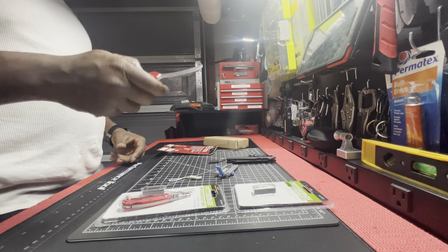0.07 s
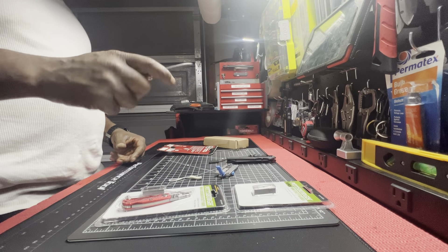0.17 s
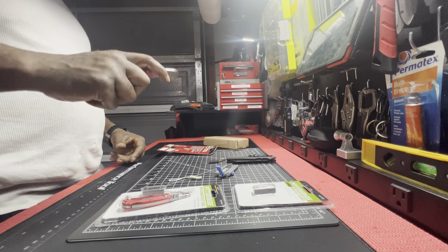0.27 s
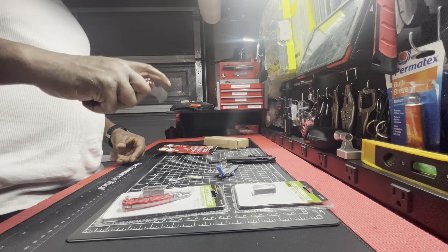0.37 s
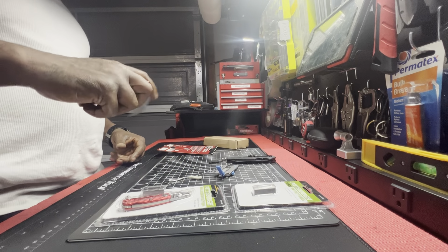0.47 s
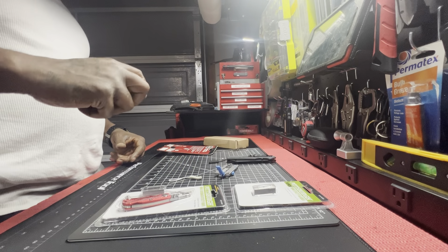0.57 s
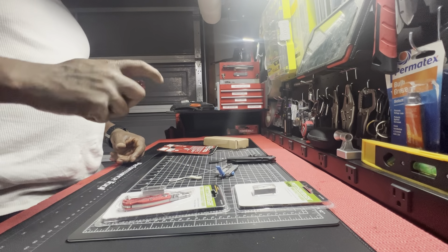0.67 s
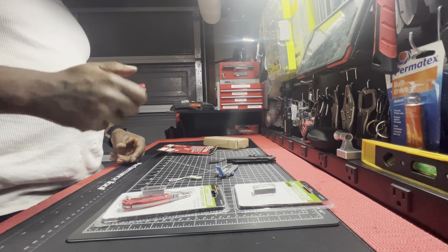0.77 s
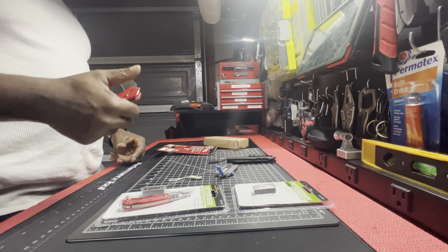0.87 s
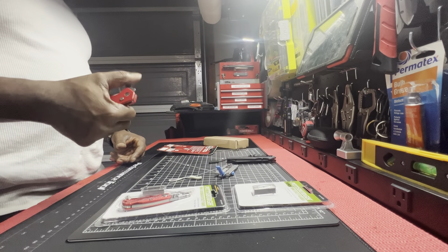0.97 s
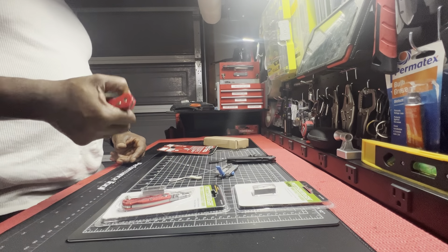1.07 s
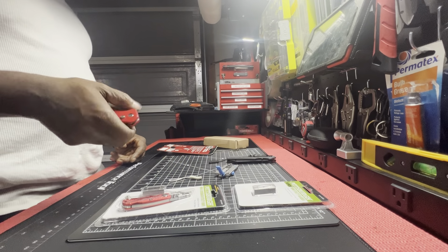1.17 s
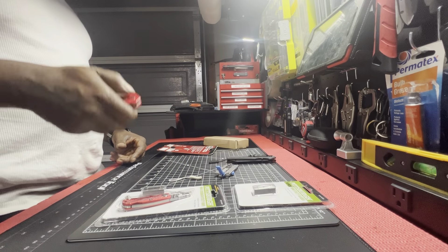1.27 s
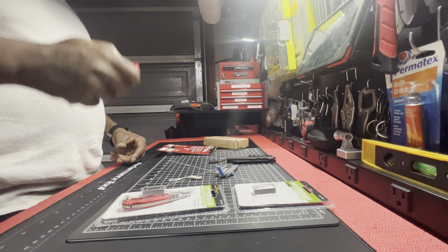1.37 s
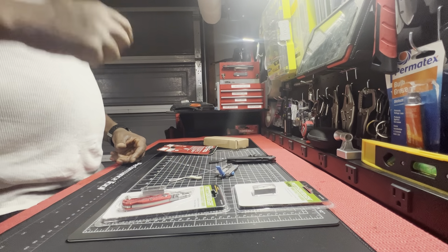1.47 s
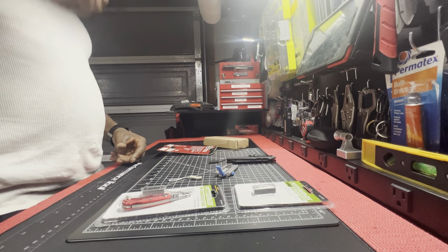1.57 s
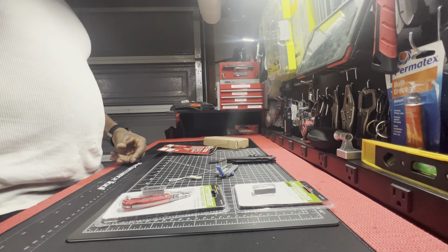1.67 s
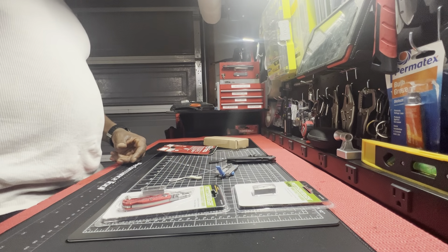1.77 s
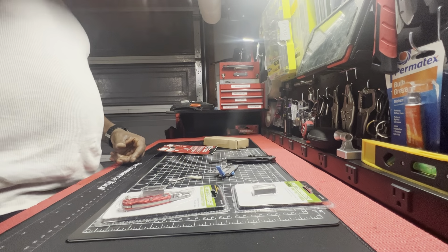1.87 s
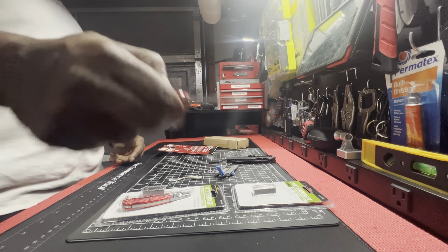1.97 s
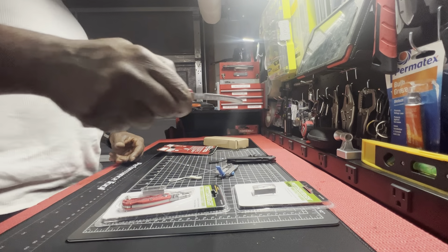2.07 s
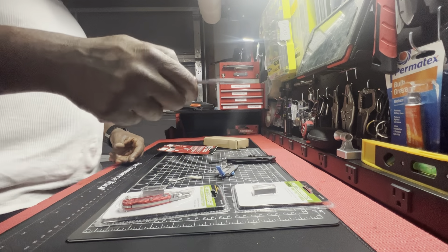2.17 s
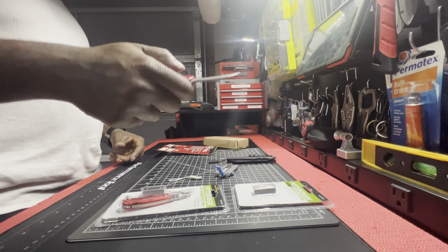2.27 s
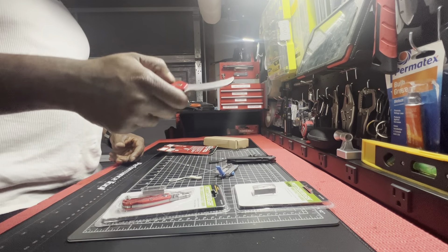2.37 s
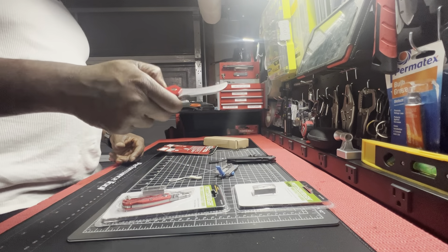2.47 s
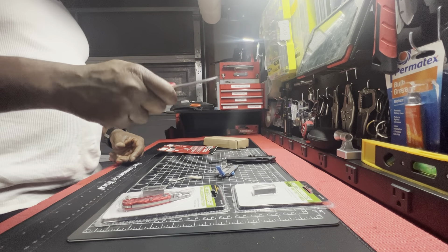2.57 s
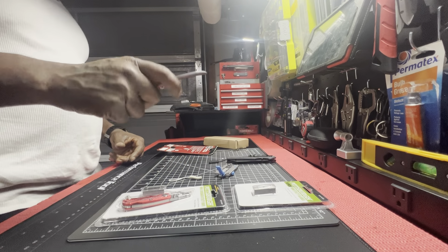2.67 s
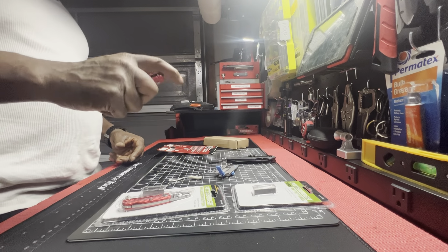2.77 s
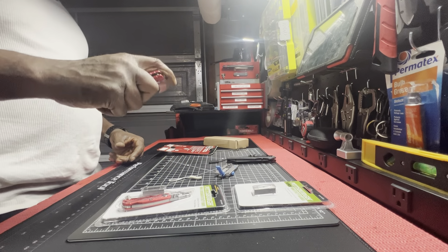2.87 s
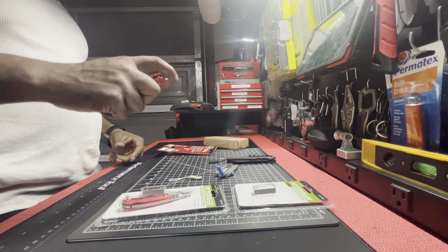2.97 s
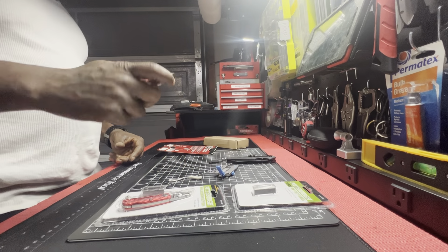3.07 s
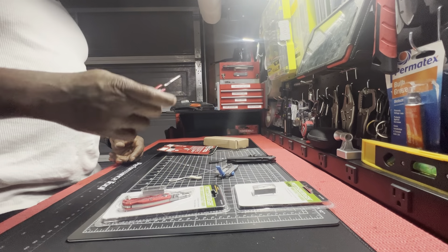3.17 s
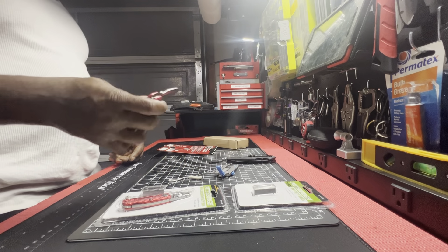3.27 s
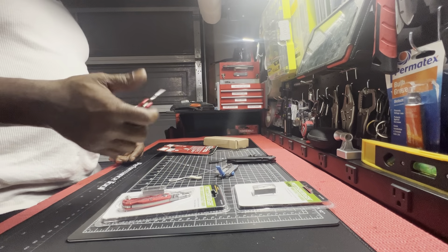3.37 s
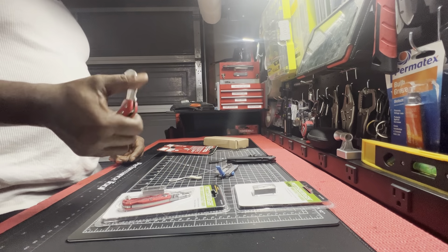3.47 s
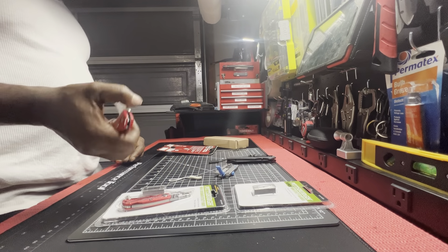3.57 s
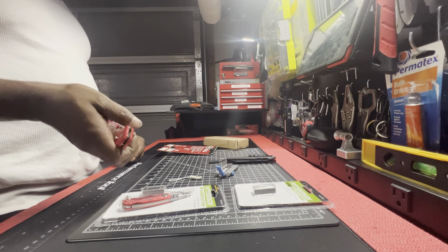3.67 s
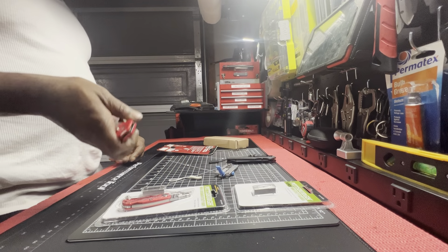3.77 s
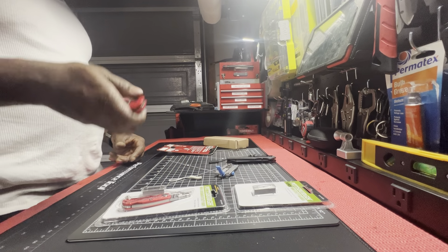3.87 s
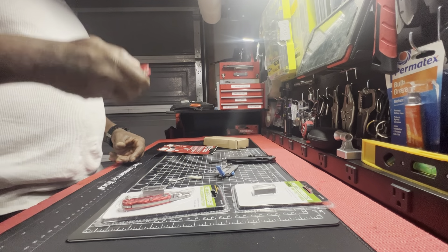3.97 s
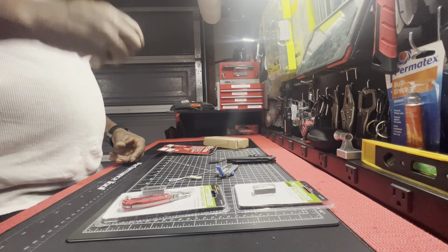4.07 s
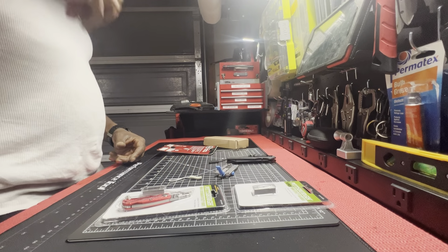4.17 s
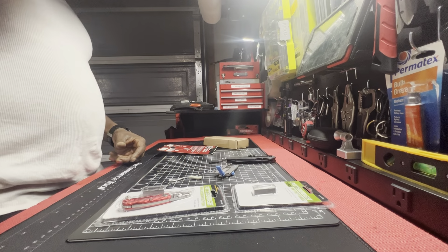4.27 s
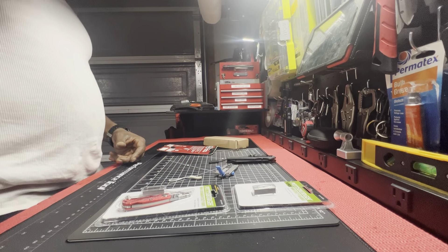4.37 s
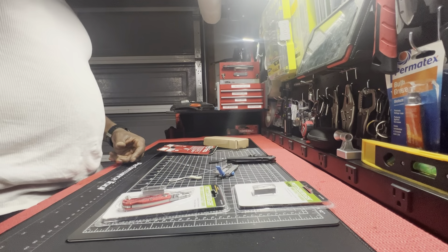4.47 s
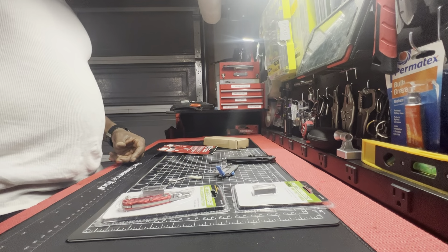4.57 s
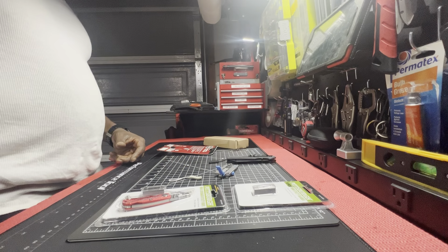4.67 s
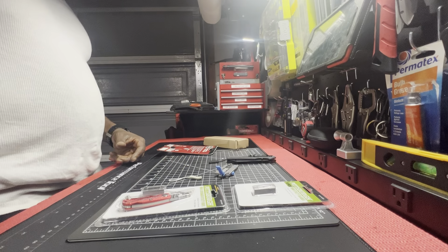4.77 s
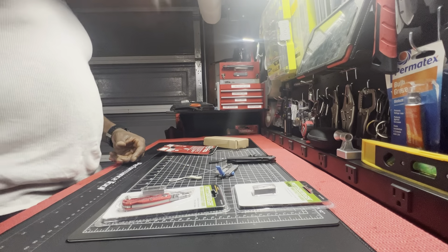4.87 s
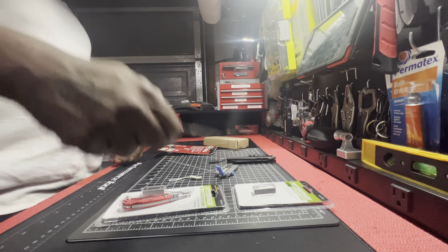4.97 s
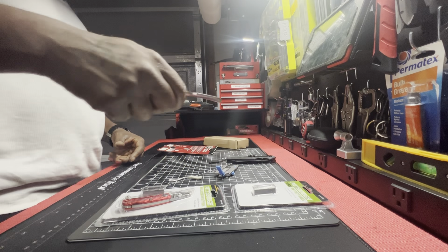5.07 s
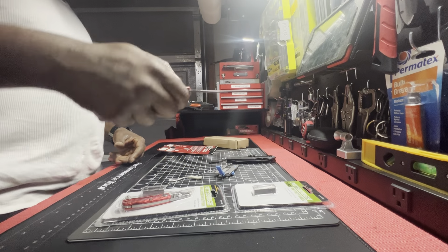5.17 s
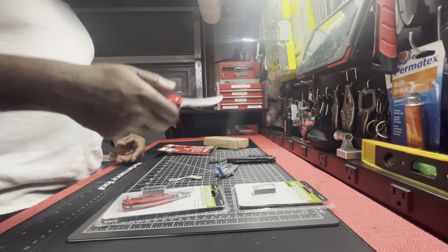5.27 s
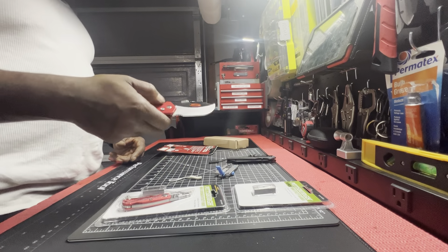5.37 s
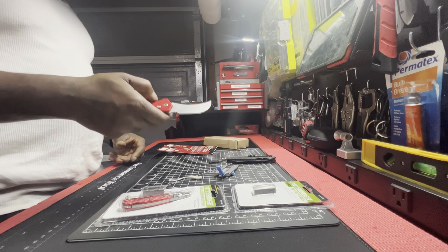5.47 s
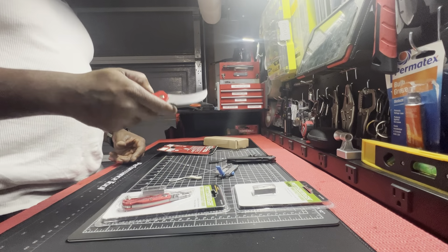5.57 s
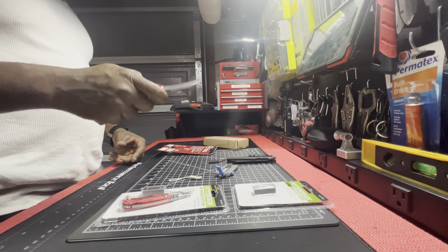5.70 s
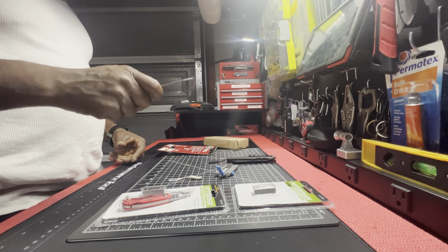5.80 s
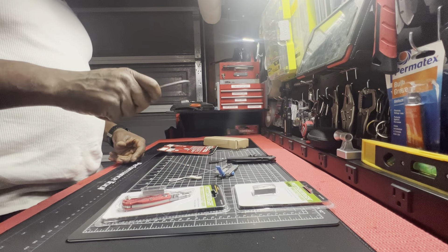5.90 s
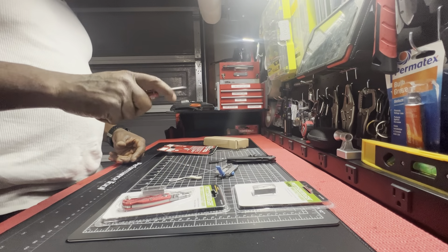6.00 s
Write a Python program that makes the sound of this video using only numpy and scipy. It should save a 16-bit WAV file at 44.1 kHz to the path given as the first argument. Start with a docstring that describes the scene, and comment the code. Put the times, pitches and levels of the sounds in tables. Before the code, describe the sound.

Bright steel snaps and duller closing clicks from a pocket knife ring briefly in a small hard room, with soft rustle, low rumble and fan hiss.

```python
"""Folding knife on a workshop bench

A folding knife is flicked open and pressed shut in one hand: bursts of noise ring through steel modes,
the handle knocks, and a hard room answers with fading noise. Grainy noise rustles in swells around it.
A fan hums (wobbly sines) and hisses (shaped noise) to the right over low rumble, a wall clock ticks
(a ringing resonance) and a faint whistle (narrow noise) comes and goes."""
import sys
import numpy as np
from scipy import signal
from scipy.fft import rfft, irfft, next_fast_len
from scipy.io import wavfile
from scipy.ndimage import map_coordinates

SR = 44100
rng = np.random.default_rng(int(sys.argv[2]) if len(sys.argv) > 2 else 0)


def dump(signal):
    """Clip the signal to [-1, 1] and save it as 16-bit WAV at the path in sys.argv[1]."""
    limited = np.clip(np.atleast_2d(signal).T, -1, 1)
    pcm = np.round(limited * 32767).astype(np.int16)
    wavfile.write(sys.argv[1], SR, pcm)


N = 266187  # length in samples, about 6 s


def amp(db):
    """Turn decibels into a gain."""
    return 10 ** (np.asarray(db) / 20)


def unit(x):
    """Scale a sound to an rms level of 1."""
    return x / np.sqrt(np.mean(x ** 2) + 1e-20)


def along(points, hz):
    """Read a curve of (Hz, value) points, with pitch on a log axis."""
    f, v = np.transpose(points)
    return np.interp(np.log(hz + 1), np.log(f + 1), v)


def wobble(rate):
    """A smooth random curve through `rate` random points a second."""
    return map_coordinates(rng.standard_normal(2000), [np.arange(N) * rate / SR])


def filtered(x, response):
    """Shape x by a complex response of frequency."""
    m = next_fast_len(x.shape[-1] + 8192)  # spare room for the ringing
    spectrum = rfft(x, m) * response(np.fft.rfftfreq(m, 1 / SR))
    return irfft(spectrum, m)[..., :x.shape[-1]]


def resonances(modes, f, scatter_db=0):
    """Response of (Hz, width Hz, dB) modes that ring after a blow, each varied at random by scatter_db."""
    total = 0
    for c, w, db in modes:
        strength = amp(db + scatter_db * rng.standard_normal())
        total = total + strength * 1j * f * w / (c * c - f * f + 1j * f * w)
    return total


SWELL_RANGE_DB = 20  # the rise and fall times of a swell cover this many dB


def swells(rows):
    """Gain of (peak s, dB, rise s, fall s) swells, straight lines in dB, summed as power."""
    t, power = np.arange(N) / SR, np.zeros(N)
    for s, db, rise, fall in rows:
        drop = SWELL_RANGE_DB * np.maximum((s - t) / abs(rise), (t - s) / abs(fall))
        power += amp(2 * (db - drop))
    return np.sqrt(power)


# Spectrum of the building's rumble in the left ear. Each row: frequency in Hz, level in dB per Hz.
RUMBLE_SPECTRUM = [(22, -100), (32, -82), (50, -79), (92, -74), (125, -81.5), (180, -84.5), (300, -83.5),
                   (420, -89.5), (750, -99), (1550, -103), (2400, -120), (5000, -128), (9000, -129),
                   (10200, -140), (16000, -148)]
# Balance of the rumble. Each row: frequency in Hz, left minus right in dB.
RUMBLE_BALANCE = [(60, 0), (110, -2.5), (200, 0.5), (380, 6.5), (600, 2), (1000, -1)]
# How alike the ears are. Each row: frequency in Hz, likeness (limited to -1 = opposite .. 1 = same).
EAR_LIKENESS = [(60, 2.5), (130, -0.13), (290, -0.4), (640, -0.46), (1400, -2.5)]
# Motor tones. Each row: frequency in Hz, unsteadiness in random points a second,
# usual rms level in dB midway between the ears.
MOTOR_TONES = [(58.9, 4.5, -57.5), (151.3, 5, -61), (237, 6.5, -71.5)]


def room_tone():
    """Building rumble, alike in both ears only in the bass, with three unsteady motor tones."""
    def turn(f):
        return np.arccos(np.clip(along(EAR_LIKENESS, f), -1, 1)) / 2

    # sum and difference of two noises: their shares set how alike the ears are
    middle, side = filtered(rng.standard_normal((2, N)), lambda f: (
        amp(along(RUMBLE_SPECTRUM, f)) * [np.cos(turn(f)), np.sin(turn(f))]))
    ears = np.array([middle + side, middle - side])
    rumble = filtered(ears, lambda f: amp(along(RUMBLE_BALANCE, f) * [[0], [-1]])) * np.sqrt(SR / 2)

    t, hum = np.arange(N) / SR, np.zeros(N)
    for hz, rate, db in MOTOR_TONES:
        level = amp(db + 0.49 * wobble(rate)) * np.sqrt(2)  # rms to peak
        hum += level * np.sin(2 * np.pi * hz * t + 1.2 * wobble(rate))
    return rumble + hum * amp([[-1.3], [1.3]])  # a little louder on the right


# Air in the fan's housing, as heard on the right. Each row: frequency in Hz, level in dB per Hz.
FAN_SPECTRUM = [(500, -112), (750, -96.5), (1000, -88.5), (1250, -91), (1550, -81.5), (1900, -96.5),
                (2400, -103), (3100, -124), (3700, -107), (4300, -102), (5200, -119), (6200, -114),
                (7050, -103), (8400, -112), (9800, -132), (12000, -145)]
# The fan's change of level on the left. Each row: frequency in Hz, gain in dB (negative is weaker).
FAN_LEFT_GAIN = [(1000, -20), (1550, -22.5), (4300, -28.5)]


def fan():
    """Turbulent air in a housing near the right ear: shaped noise with a slight flutter."""
    flutter_db = 0.89 * wobble(70) + 0.7 * wobble(12)
    air = rng.standard_normal(N) * amp(flutter_db)
    ears = filtered(air, lambda f: amp(along(FAN_SPECTRUM, f) + along(FAN_LEFT_GAIN, f) * [[1], [0]]))
    return ears * np.sqrt(SR / 2)  # so that the levels are per Hz


# Swells of the whistle. Each row: peak in seconds, peak level in dB on the left,
# seconds to rise or fall by SWELL_RANGE_DB.
WHISTLE_SWELLS = [(0, -76.5, 0.7), (1.25, -86, 0.5), (5.85, -78.5, 0.4)]


def whistle():
    """A faint whistle near 3 kHz, noise through a narrow resonance, comes and goes on the left."""
    band = unit(filtered(rng.standard_normal(N), lambda f: resonances([(3000, 370, 0)], f) ** 2))
    gain = swells([(s, db, fade, fade) for s, db, fade in WHISTLE_SWELLS])
    return gain * band * amp([[0], [-8]])


# Colour of the rustle. Each row: frequency in Hz, relative level in dB per Hz.
RUSTLE_COLOUR = [(3000, -29.5), (5500, -6), (8500, 4.5), (10000, -5), (12000, 5), (14000, -6), (16000, -6)]
# The lower creak. Each row: frequency in Hz, width in Hz, relative level in dB.
CREAK_MODES = [(3300, 1800, 0)]
# Swells of treble rustle, some rising into a snap. Each row: peak in seconds, peak level in dB
# before the overall lift, rise in seconds, fall in seconds (both over SWELL_RANGE_DB).
RUSTLE_SWELLS = [(.01, -71, .1, .36), (.306, -76.5, 0.088, 0.027), (.434, -77, 0.11, 0.054),
                 (.548, -72, 0.022, 0.022), (.592, -75, .03, .025), (.78, -86, 0.11, 0.088),
                 (1.027, -82, 0.11, 0.0094), (1.53, -96, 0.12, .04), (1.855, -73.5, 0.1, .01),
                 (2.3, -91, .1, .25), (2.656, -76.5, 0.098, .09), (2.708, -62, 0.0092, 0.016),
                 (2.75, -74, .1, 0.06), (2.878, -89, 0.031, 0.066), (3.07, -89, 0.082, 0.23),
                 (3.19, -81.5, .03, .15), (3.404, -93.5, .1, 0.076), (3.48, -86, .03, .4),
                 (3.628, -82, .1, .01), (3.94, -86, .09, .06), (4.064, -74.5, .012, 0.018),
                 (4.12, -94, 0.072, 0.27), (4.385, -82, .11, .08), (4.518, -83, 0.047, 0.053),
                 (4.862, -68.5, 0.066, 0.012), (5.28, -92, 0.093, .15), (5.46, -87, 0.065, .05),
                 (5.928, -79, 0.022, .04), (5.99, -88, 0.097, 0.086)]
REST_DB, CREAK_DB = -104, -4.5  # faint rustle at rest, before the lift; the creak against the rustle
LIFT_DB = 2.5  # raises all of the rustle and creak


def rustle():
    """A grainy treble rustle and a lower creak: shaped noises that swell and fade together."""
    grains = rng.standard_normal((3, N)) * amp(1.5 * wobble(150))
    shared, right_only = unit(filtered(grains[:2], lambda f: amp(along(RUSTLE_COLOUR, f))))
    creak = amp(CREAK_DB) * unit(filtered(grains[2], lambda f: resonances(CREAK_MODES, f) ** 2))
    resting = amp(REST_DB + 3 * wobble(25))
    gain = amp(LIFT_DB) * (swells(RUSTLE_SWELLS) + resting)
    left = shared + creak
    right = 0.89 * shared + 1.3 * right_only + 0.62 * creak
    return gain * np.array([left, right])


# How long the room rings. Each row: frequency in Hz, time to fade by 60 dB in seconds.
ROOM_FADE = [(500, 0.55), (2600, 0.52), (7000, 0.45), (10000, 0.37), (13000, .3), (16000, 0.16)]


def tail():
    """The room's answer to a single click, one noise per ear; treble dies first."""
    noise = rng.standard_normal((2, SR // 2 + SR // 4))
    hz, t, z = signal.stft(noise, SR, nperseg=256)
    fade = amp(-60 * t / along(ROOM_FADE, hz)[:, None])
    echo = signal.istft(z * fade, SR, nperseg=256)[1]
    return echo / np.linalg.norm(echo[0])


# Steel touching steel. Each row: start in seconds, strength in dB before the chatter's shape,
# chatter's time to fade by 60 dB in seconds, brightness in rough dB per octave,
# pitch in Hz of the part that is touched.
STEEL_CONTACTS = [(0.3076, -45.5, 0.009, -11, 3000), (0.415, -60.5, 0.063, -11, 3200),
                  (.668, -63, .058, -19, 3000), (1.03, -32, .038, 11, 6100),
                  (1.0328, -26.5, 0.029, -2, 5940), (1.0327, -22, .035, 5, 3000),
                  (1.8595, -23.5, .093, 0, 3600), (1.865, -5.5, 0.012, 3.5, 8800),
                  (1.8659, -11, 0.02, 1.5, 3870), (1.8702, -20.5, 0.033, 0.5, 3782),
                  (2.1577, -44, 0.051, -3, 6300), (2.165, -51.5, 0.031, -4, 4970),
                  (2.6554, -49.5, 0.031, -14, 3300), (2.707, -41.5, 0.01, -8, 4000),
                  (2.8717, -60.5, 0.093, -11.5, 3000), (3.6316, -31.5, .065, 7, 5690),
                  (3.6349, -18.5, 0.031, 9, 3700), (3.6388, -29, .025, -2.5, 2130),
                  (3.6453, -42, 0.053, -21.5, 2250), (3.6521, -42.5, 0.046, -24, 2150),
                  (4.0647, -54.5, 0.0073, 6, 11920), (4.363, -54.5, 0.027, -5, 6000),
                  (4.3853, -44.5, 0.037, -17.5, 2600), (4.8688, -19, 0.087, -1.5, 9500),
                  (4.8729, -7.5, .022, -1, 9000), (4.8748, -13.5, 0.02, -1.5, 3860),
                  (4.8788, -18.5, 0.017, -6.5, 3900), (4.888, -30, 0.057, -6.5, 2094),
                  (5.1161, -45, 0.043, -4, 4500), (5.8012, -59.5, 0.0088, -10, 3500)]
# Modes of blade, liners and lock. Each row: frequency in Hz, width in Hz,
# relative level in dB with the blade open, relative level in dB with it shut.
STEEL_MODES = [(2114, 700, 0.5, -2), (2750, 690, -6.5, 10.5), (3830, 420, -13.5, -1.5),
               (4450, 120, -12.5, -7), (5570, 360, 2, 1.5), (6333, 490, -5, 1), (8185, 110, -6.5, 5),
               (9390, 210, 4, -5.5), (11430, 2100, -3, -0.5), (10980, 730, -1.5, 3.5), (12300, 210, -2, -6),
               (14070, 420, 4, -9), (15460, 420, -6, -6.5)]
# Colour of the bare impact. Each row: frequency in Hz, relative level in dB.
IMPACT_COLOUR = [(700, -38.5), (1300, -16.5), (2100, -3.5), (2800, -7.5), (4000, 0.5), (6500, -0.5),
                 (9000, -0.5), (12000, -6), (16000, -5.5)]
# Modes of the handle. Each row: frequency in Hz, width in Hz, relative level in dB.
HANDLE_MODES = [(163.5, 92, -3.5), (320, 150, 1.5), (780, 200, -7.5), (1273, 170, 3)]
# When the blade starts to count as open, and when as shut again: each a list of seconds, in pairs.
OPEN_FROM_S = [-1, 1.85, 4.85]
SHUT_FROM_S = [.5, 3.5, 7]
FREE_OPEN, FREE_SHUT = 0.9, 0.15  # how far the modes lean to the open blade (0-1)
KNOCK_OPEN_DB, KNOCK_SHUT_DB = -21, -25.5  # the handle's knock against the contact
ROOM_RING = 0.29  # how much of the knife's ring the room keeps
ROOM_DB, ROOM_DELAY_S = -10.5, 0.0043  # the walls' answer: gain and delay
LEFT_DELAY_S = 0.0002473  # sound reaches the left ear later


def knife():
    """Each contact chatters briefly, ringing blade and lock and knocking the handle."""
    out, t = np.zeros((2, N + 2 * SR)), np.arange(SR // 8) / SR
    mode_hz = np.fft.rfftfreq(next_fast_len(len(t) + 8192), 1 / SR)  # same grid as filtered()
    push = filtered(np.exp(-(t / 0.00018 - 2) ** 2), lambda f: resonances(HANDLE_MODES, f))
    for s, db, t60, tilt_db, part_hz in STEEL_CONTACTS:
        is_open = any(a < s < b for a, b in zip(OPEN_FROM_S, SHUT_FROM_S))
        opened, knock_db = (FREE_OPEN, KNOCK_OPEN_DB) if is_open else (FREE_SHUT, KNOCK_SHUT_DB)
        # long chatter also starts slowly
        shape = amp(-60 * t / t60) * (1 - np.exp(-t / (0.0066 * t60)))
        size = amp(db) * np.sqrt(np.mean(shape ** 2))
        modes = [(hz, width, opened * open_db + (1 - opened) * shut_db)
                 for hz, width, open_db, shut_db in STEEL_MODES]
        ring = resonances(modes, mode_hz, scatter_db=1.5)

        def steel(f):
            return amp(along(IMPACT_COLOUR, f) + tilt_db * np.log2(f / 6000 + 0.2))

        def part(f):  # a 9 dB bump at the pitch of the touched part
            return amp(9 * np.exp(-(np.log2(f / part_hz + 0.0073) / 0.19) ** 2))

        # uneven, spiky noise
        taps = rng.standard_normal((2, len(t))) * amp(6.5 * rng.standard_normal((2, len(t))))
        clatter = filtered(taps * shape, lambda f: steel(f) * part(f) * (0.2 + ring))
        direct, bench = (size * unit(x) for x in clatter)
        knock = amp(db + knock_db) * push / np.abs(push).max()
        # the right ear is nearer and hears another bounce off the bench
        left = filtered(direct + knock, lambda f: np.exp(-2j * np.pi * f * LEFT_DELAY_S))
        right = 0.85 * (direct + knock) + 0.5 * bench

        # the room gathers sound from all sides of the knife, so the modes blur
        click = 1.0 * (t == t[99])  # a little late, as this filter also spreads backwards
        blow = size * unit(filtered(click, lambda f: (
            steel(f) * (1 + ROOM_RING * np.abs(ring)) * np.sqrt(part(f)))))
        wet = amp(ROOM_DB) * signal.fftconvolve((blow + knock)[None], tail(), axes=1)

        k = round(s * SR)
        out[:, k:k + len(t)] += [left, right]
        k += round(ROOM_DELAY_S * SR)
        out[:, k:k + wet.shape[1]] += wet
    return out[:, :N]


def clock():
    """A short hollow tick, a ringing resonance, once a second and louder on the right, with one echo."""
    beats = np.zeros(N)
    at = 0.5635 + np.arange(6)  # seconds
    beats[np.round(at * SR).astype(int)] = 1
    beats[np.round((at + 0.0063) * SR).astype(int)] = 0.14  # the echo
    tick = filtered(beats, lambda f: resonances([(1460, 310, 0)], f) ** 2)
    return amp(-41.5) * tick / np.abs(tick).max() * amp([[-20], [0]])


def scene():
    """All the sources together, in two ears."""
    return room_tone() + fan() + whistle() + rustle() + knife() + clock()


# Treble colour of each channel: dips near 5.3 and 7.5 kHz, steep fall above 15.7 kHz.
# Each row: frequency in Hz, gain in dB.
LEFT_COLOUR = [(4700, 0), (5300, -8.5), (5900, 4), (7000, 0.5), (7600, -5), (8500, 3.5), (10200, -1),
               (15700, -1), (16100, -26), (17000, -58.5)]
RIGHT_COLOUR = [(4700, 0.5), (5300, -3), (5900, -3.5), (7000, -8), (7500, -12.5), (8500, -7), (10200, -2.5),
                (15700, -1.5), (16100, -36), (17000, -58)]
FULL_SCALE = 0.62  # the level that peaks bend towards
TOP_HZ = 17323  # nothing is kept from here up


def record(dry):
    """Each channel has its own treble colour, loud peaks saturate softly, and the top is cut off."""
    coloured = filtered(dry, lambda f: amp([along(LEFT_COLOUR, f), along(RIGHT_COLOUR, f)]))
    soft = coloured / (1 + (coloured / FULL_SCALE) ** 4) ** (1 / 4)
    return filtered(soft, lambda f: amp(along([(15900, 0), (16400, -24.5)], f)) * (f < TOP_HZ))


dry = scene()
out = record(dry)
dump(out)
```